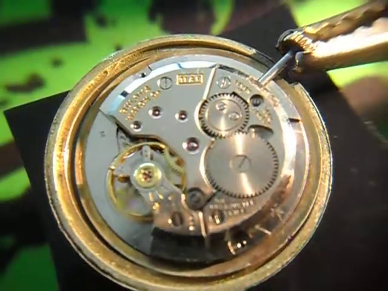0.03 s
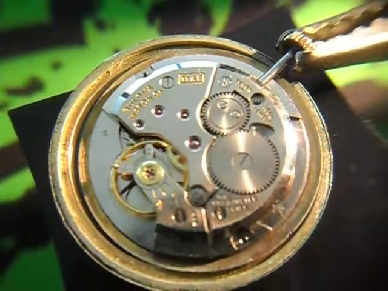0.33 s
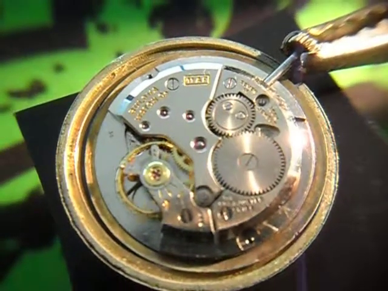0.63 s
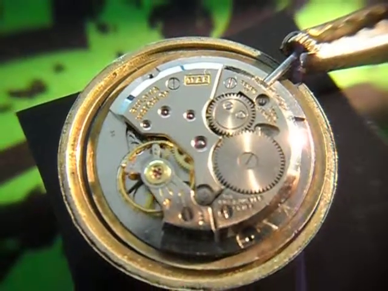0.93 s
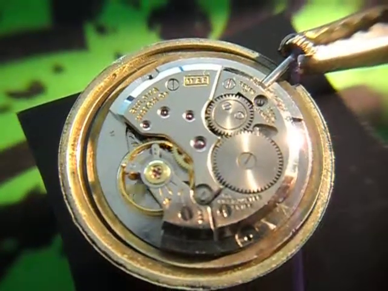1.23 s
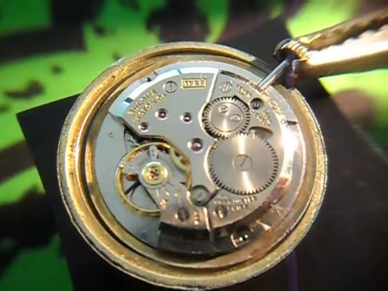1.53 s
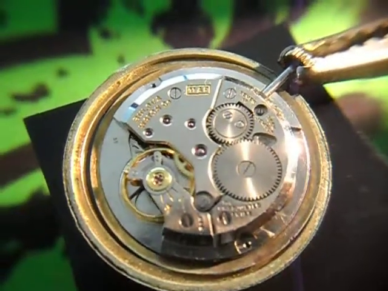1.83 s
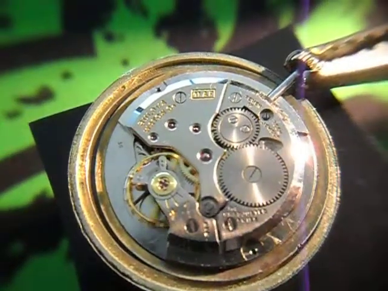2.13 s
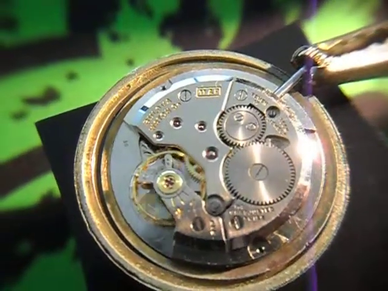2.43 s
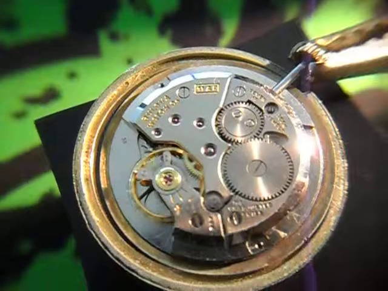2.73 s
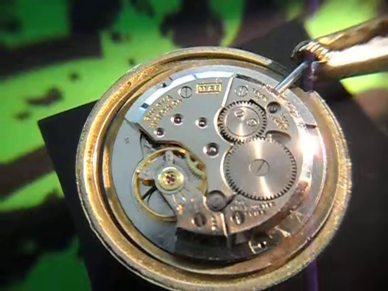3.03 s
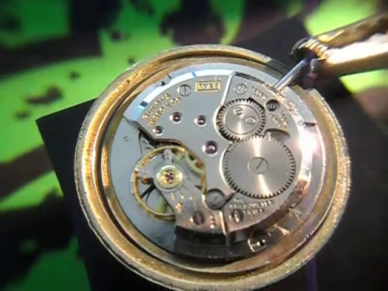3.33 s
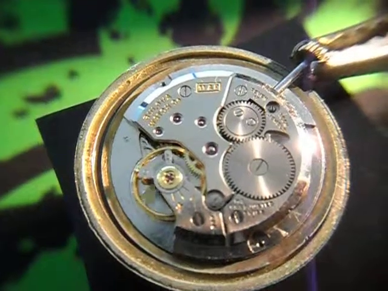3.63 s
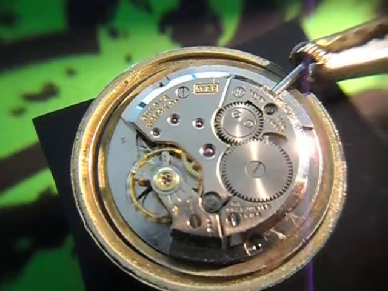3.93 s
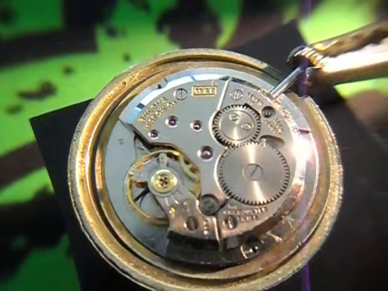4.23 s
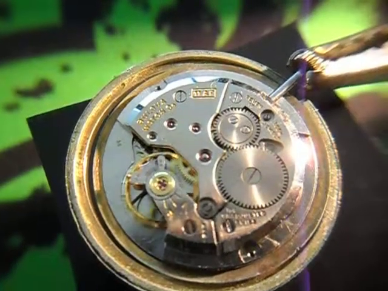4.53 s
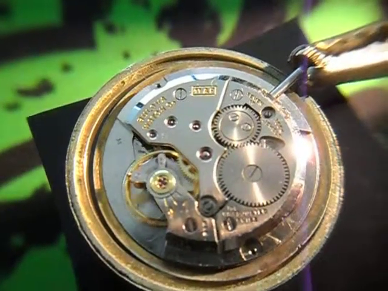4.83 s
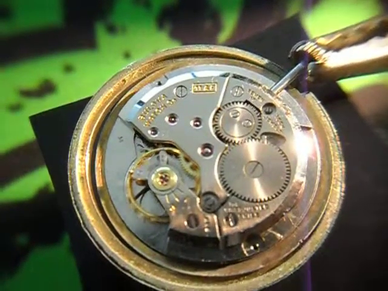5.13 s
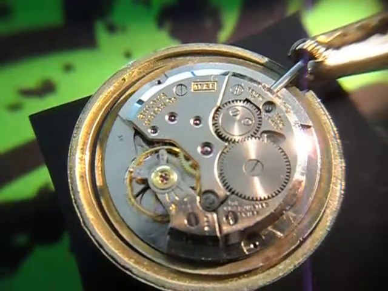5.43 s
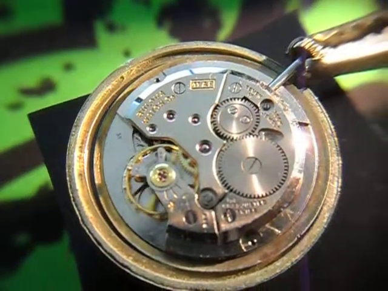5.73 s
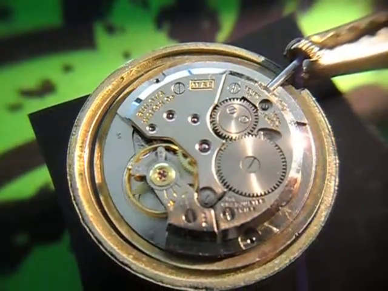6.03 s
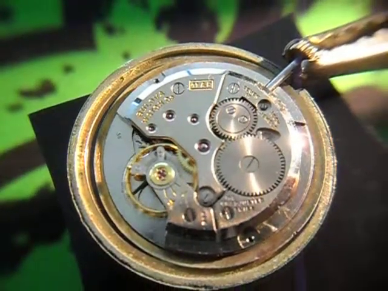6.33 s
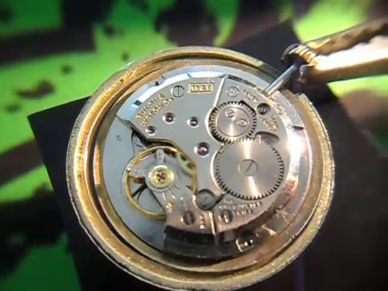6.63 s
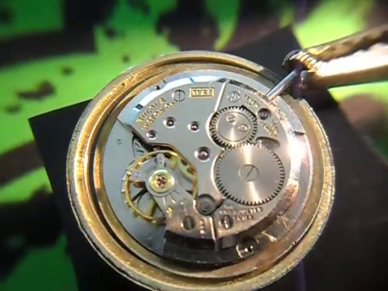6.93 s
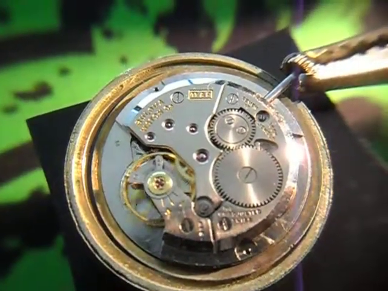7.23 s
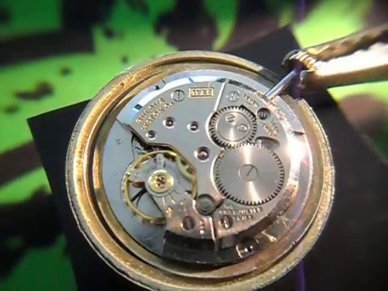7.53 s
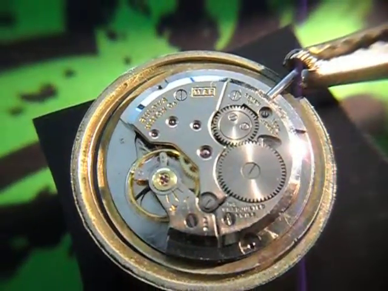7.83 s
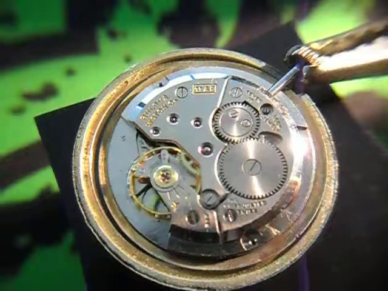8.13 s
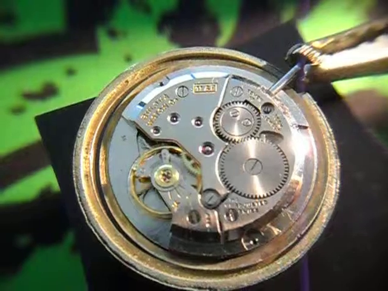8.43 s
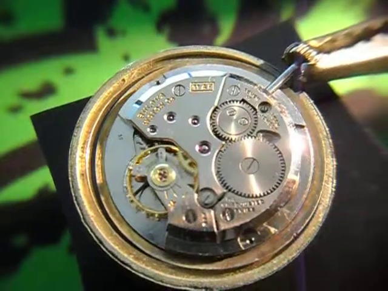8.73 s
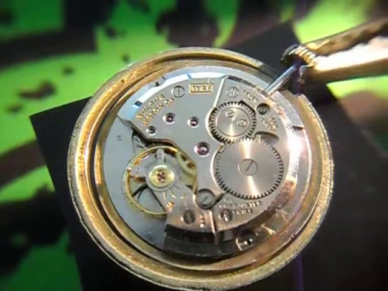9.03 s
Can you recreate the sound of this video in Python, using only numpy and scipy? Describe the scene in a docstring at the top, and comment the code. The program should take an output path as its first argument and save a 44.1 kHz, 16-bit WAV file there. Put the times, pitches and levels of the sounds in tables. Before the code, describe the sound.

A small mechanical watch ticks fast and very softly throughout, close and dry, under a low mains hum, gentle room rumble and microphone hiss with a faint thin whine. Several light plastic handling bumps occur in the first half. Then a single sharp click stands out as the loudest sound, and a dull knock follows shortly after, leaving only the hum and ticking.

```python
"""A quiet room, where an open mechanical watch ticks faintly under a small hand-held camera.
Five times a second the escapement drops on a pallet and rings the watch plates, tick and tock in turn.
Mains hum throbs against a lower motor tone over a soft rumble; the electronics add hiss and a thin whine.
Handling rings the camera's plastic body with a few dull knocks and one sharp click."""
import sys
import numpy as np
from scipy import signal
from scipy.fft import rfft, irfft
from scipy.io import wavfile

SR = 44100
rng = np.random.default_rng(int(sys.argv[2]) if len(sys.argv) > 2 else 0)


def generate_wav(sig):
    """Save sig (samples, or channels by samples) to the path in sys.argv[1] as 16-bit PCM at SR."""
    pcm = np.round(np.clip(np.atleast_2d(sig).T, -1, 1) * 32767).astype(np.int16)
    wavfile.write(sys.argv[1], SR, pcm)


N = 405279

# steady tones of the mains, a motor and the electronics: pitch_hz, rms_level_db
HUM_TONES = [(59, -79), (105.815, -59.5), (120.022, -48.9), (134.21, -69.3), (158, -76), (240, -77),
             (300, -77), (360, -80), (889.6, -79.5), (7140.2, -74.6), (7851, -96)]
# EQ curve of the room's air: frequency_hz, gain_db
RUMBLE_CURVE = [(10, -8.5), (28, 2), (46, -8.5), (75, -5), (92, 3), (135, 3), (146, 0), (170, 0.5),
                (235, -5.5), (320, -3.5), (420, -9.5), (800, -14.5), (2000, -25.5), (6000, -49.5)]
# peaks and dips that colour the room: centre_hz, width_hz, gain_db
ROOM_COLOUR = [(650, 110, 1), (1350, 180, -2.5), (2200, 100, 2.5)]
# EQ curve of the microphone hiss: frequency_hz, gain_db
HISS_CURVE = [(100, -2.5), (1500, 2), (4000, -2.5), (7000, -4.5), (10000, -6), (10500, -10.5),
              (11000, -24.5), (11600, -23), (12200, -39)]
# ring of the watch plates and case: pitch_hz, gain_db, t60_s
WATCH_MODES = [(1090, -0.5, 0.058), (1823, -1.5, .03), (2200, 0.5, 0.055), (2930, -1.5, 0.04),
               (3324, -4.5, 0.046), (3430, -5, 0.04), (3620, -8, 0.035), (4800, -7.5, 0.026)]
# fader ride on the tock, which swells and eases back: time_s, gain_db
TOCK_RIDE = [(0, -63), (2.7, -62.5), (4.2, -55.5), (7, -56), (9.1, -60)]
# hits on the camera body: start_s, peak_db, centre_hz, spread_octaves, pitch_ratio, ring_time_ratio
CAMERA_HITS = [(1.881, -48, 950, .6, 1.04, 1), (1.893, -49, 850, .6, 1.4, 1.1),
               (2.842, -47, 600, .7, 1.05, .9), (4.5855, -44, 1000, 0.39, 1.57, 1.1),
               (4.5855, -50.5, 3600, .3, 0.95, 1.7), (4.826, -43, 600, 0.59, 1.1, 0.59),
               (5.9362, -27.5, 2300, 2.8, 1, 1.07), (6.9865, -33, 300, 0.8, 1.08, 0.77),
               (6.9872, -39.5, 1350, .25, 1.1, 0.91)]
# ring of the plastic body, retuned by each hit: base_pitch_hz, gain_db, base_t60_s
CAMERA_MODES = [(288, -3, 0.033), (420, 1, 0.029), (532, -3.5, 0.042), (630, 5, 0.037), (852, -10, 0.034),
                (1080, -16.5, .035), (1298, 3.5, 0.026), (1494, -3, 0.027), (2100, -6.5, 0.028),
                (2504, -6.5, 0.021), (3010, -10, 0.023), (3670, -5, 0.014), (4080, -12.5, 0.019),
                (5420, -6, 0.0077), (6280, 0, 0.0066), (7840, -4.5, 0.0069), (9670, -5, 0.005)]


def amp(db):
    """Decibels to gain."""
    return 10 ** (np.asarray(db) / 20)


def add(mix, start_s, sound):
    """Drops a sound into the mix at start_s."""
    part = mix[max(round(start_s * SR), 0):][:len(sound)]
    part += sound[:len(part)]


def shaped_noise(curve, bells=()):
    """Noise through an EQ curve and bell filters, scaled to rms 1."""
    hz = np.fft.rfftfreq(N, 1 / SR)
    points_hz, points_db = np.transpose(curve)
    eq_db = np.interp(np.log(hz + 1), np.log(points_hz), points_db)
    for centre_hz, width_hz, gain_db in bells:
        eq_db += gain_db / (1 + (2 * (hz - centre_hz) / width_hz) ** 2)
    noise = irfft(rfft(rng.standard_normal(N)) * amp(eq_db), N)
    return noise / np.sqrt(np.mean(noise ** 2) + 1e-20)


def plate_ring(modes, weights, lag_s):
    """A struck plate rings out; low bending waves travel slower and arrive later (lag_s at 1 kHz)."""
    hz, gain_db, t60_s = np.transpose(modes)[:, :, None]
    delay_s = lag_s * np.sqrt(1000 / hz)
    t = np.maximum(np.arange(SR // 10) / SR - delay_s, 0)
    decay = amp(gain_db - 60 * t / t60_s)
    return weights @ (decay * np.sin(2 * np.pi * hz * t))


def hum_and_whine():
    """A bed of steady tones; the motor beats against the mains hum about 14 times a second."""
    t = np.arange(N) / SR
    return np.sqrt(2) * sum(amp(db) * np.sin(2 * np.pi * (hz * t + rng.random())) for hz, db in HUM_TONES)


def room_rumble(level_db=-56):
    """Soft, dark air, coloured by the room's resonances."""
    return amp(level_db) * shaped_noise(RUMBLE_CURVE, ROOM_COLOUR)


def microphone_hiss(level_db=-62.5):
    """The microphone's own even noise floor."""
    return amp(level_db) * shaped_noise(HISS_CURVE)


def balance_beats(first_s=.085, beat_s=.200045, slowing_s_per_beat=.0000217, tick_gain_db=-57.5):
    """Beat times and gains: the balance slows a hair each swing; the tick holds, the tock rides."""
    beat = np.arange(int(N / SR / beat_s) + 1)
    times_s = first_s + beat_s * beat + slowing_s_per_beat * beat ** 2 / 2
    tock_gain_db = np.interp(times_s, *np.transpose(TOCK_RIDE))
    return times_s, np.where(beat % 2, tock_gain_db, tick_gain_db)


def watch_escapement(trim_db=3, force_scatter_db=1, mode_scatter_db=2, unlock_db=-13, unlock_lead_s=.017):
    """The fork unlocks softly, then the escape wheel drops on a pallet and rings the plates."""
    out = np.zeros(N)
    for start_s, gain_db in zip(*balance_beats()):
        force = amp(gain_db + trim_db + force_scatter_db * rng.standard_normal()) / 2
        colour = amp(mode_scatter_db * rng.standard_normal(len(WATCH_MODES)))
        tick = force * plate_ring(WATCH_MODES, colour, lag_s=0.00033)
        add(out, start_s - unlock_lead_s, amp(unlock_db) * tick)
        add(out, start_s, tick)
    return out


def camera_knocks(lag_s=0.00059, low_cut_ratio=0.2):
    """Soft blows wake a narrow band of the body's modes; a hard snap wakes them all, with no thump."""
    out = np.zeros(N)
    for start_s, peak_db, centre_hz, spread_octaves, pitch_ratio, ring_time_ratio in CAMERA_HITS:
        modes = np.array(CAMERA_MODES) * [pitch_ratio, 1, ring_time_ratio]
        blow = np.exp(-.5 * (np.log2(modes[:, 0] / centre_hz) / spread_octaves) ** 2)
        low_cut = signal.butter(2, low_cut_ratio * centre_hz, "high", fs=SR, output="sos")
        knock = signal.sosfilt(low_cut, plate_ring(modes, blow, lag_s))
        add(out, start_s - lag_s / 2, amp(peak_db) * knock / abs(knock).max())
    return out


def scene():
    """A dry mono mix: everything sits close to the one microphone."""
    bed = hum_and_whine() + room_rumble() + microphone_hiss()
    return (bed + watch_escapement() + camera_knocks())[None]


def record(dry):
    """A steep high cut takes off the top end."""
    cutoff_hz = 12250
    high_cut = signal.firwin(511, cutoff_hz, window=("kaiser", 9), fs=SR)
    return signal.oaconvolve(dry, high_cut[None], "same")


dry = scene()
out = record(dry)
generate_wav(out)
```